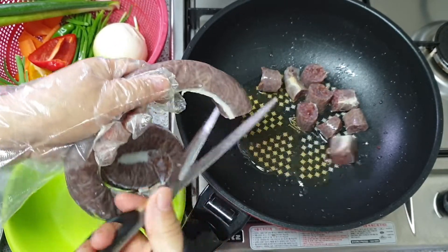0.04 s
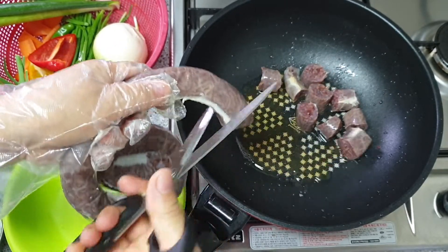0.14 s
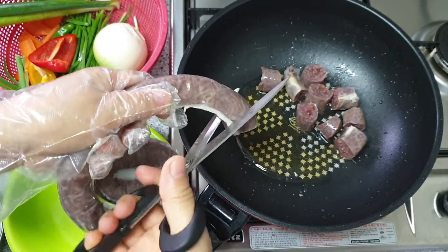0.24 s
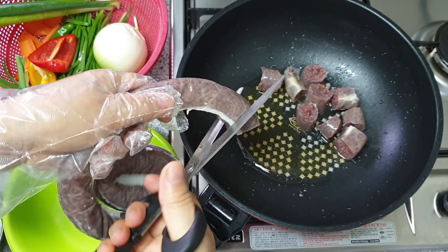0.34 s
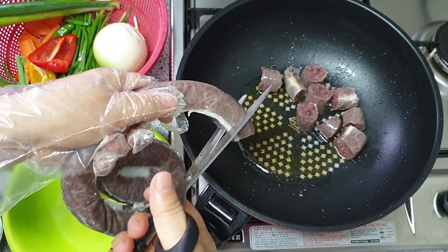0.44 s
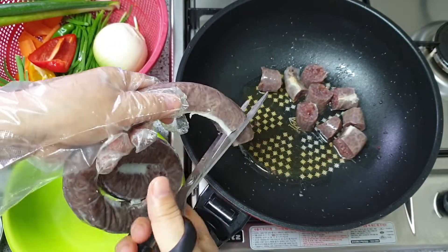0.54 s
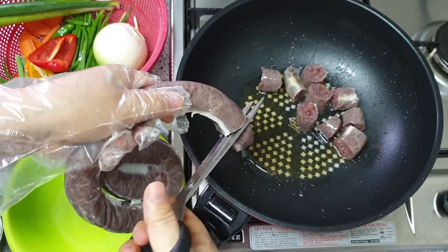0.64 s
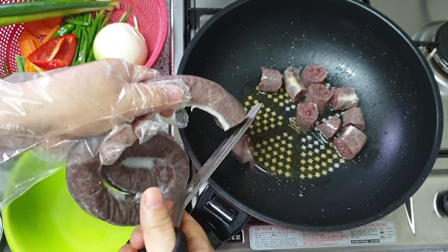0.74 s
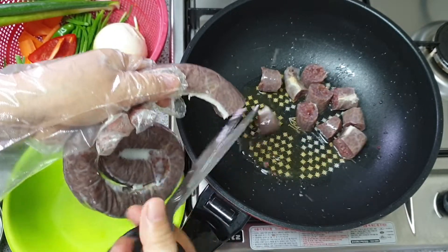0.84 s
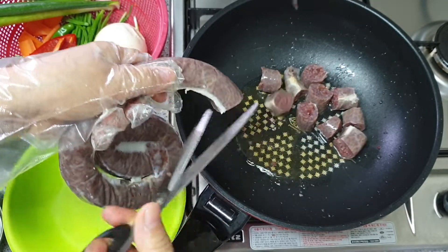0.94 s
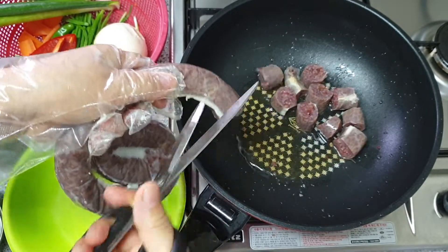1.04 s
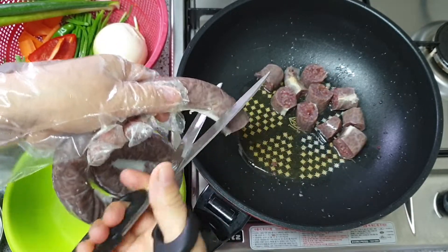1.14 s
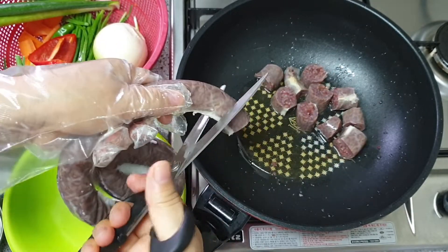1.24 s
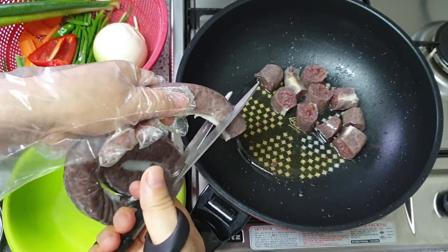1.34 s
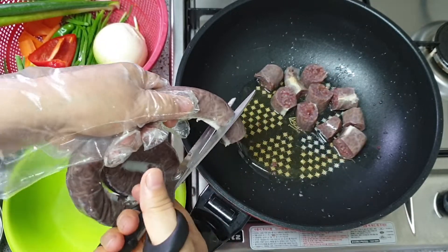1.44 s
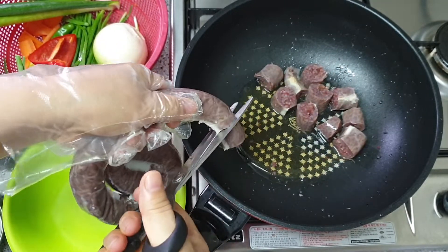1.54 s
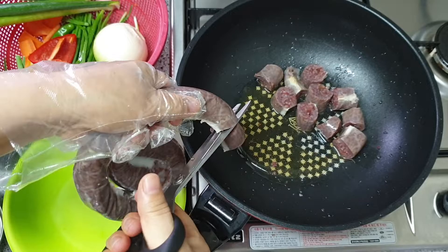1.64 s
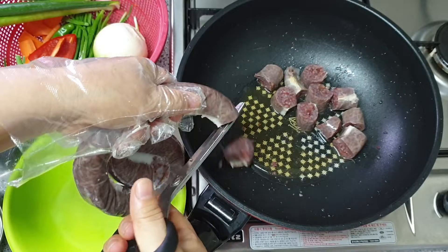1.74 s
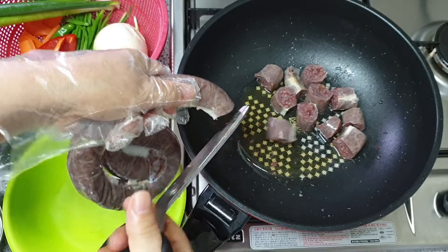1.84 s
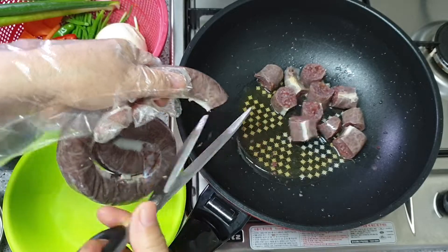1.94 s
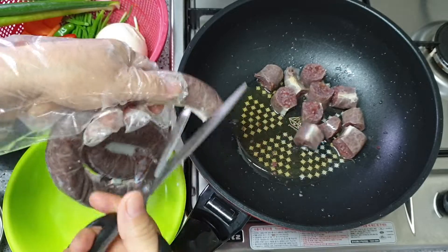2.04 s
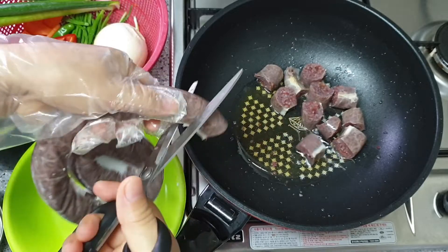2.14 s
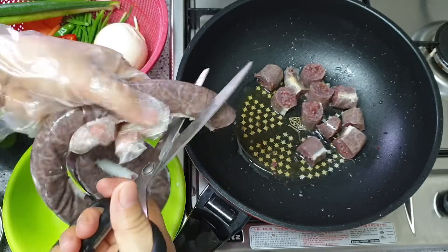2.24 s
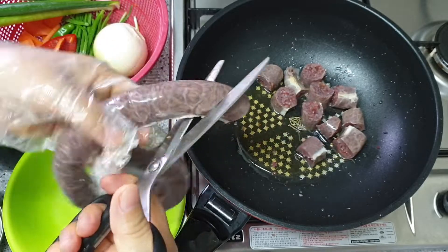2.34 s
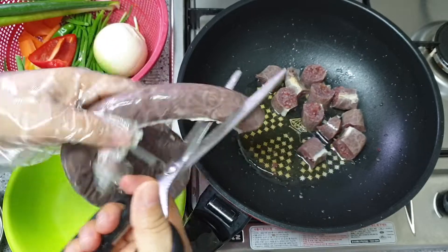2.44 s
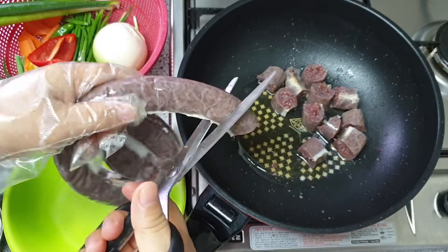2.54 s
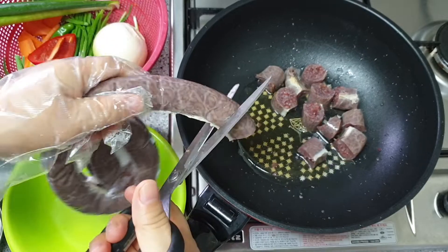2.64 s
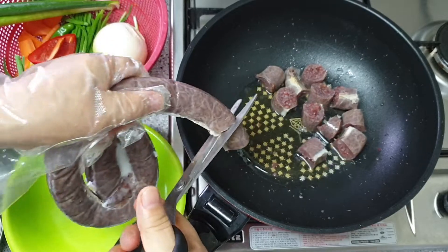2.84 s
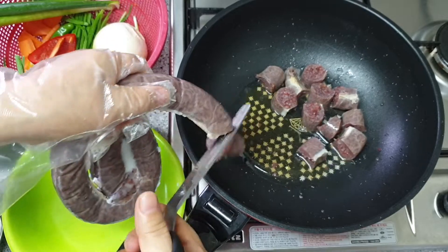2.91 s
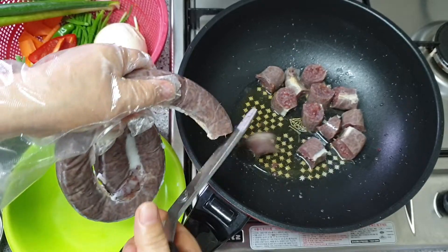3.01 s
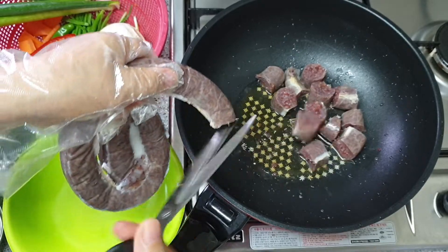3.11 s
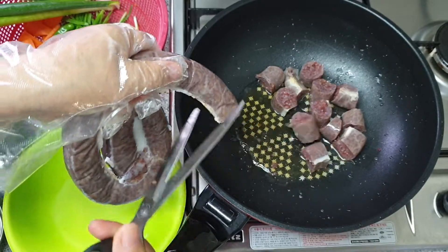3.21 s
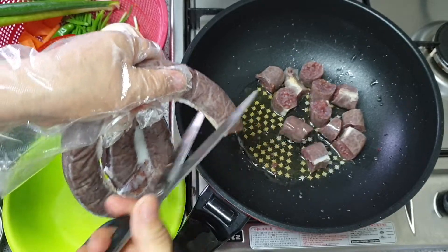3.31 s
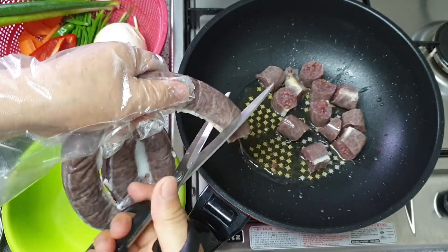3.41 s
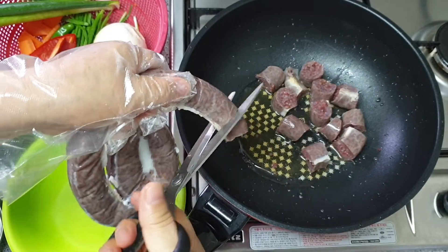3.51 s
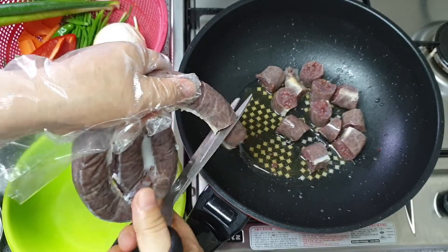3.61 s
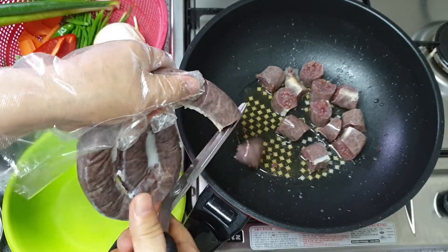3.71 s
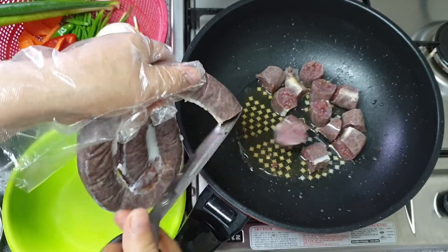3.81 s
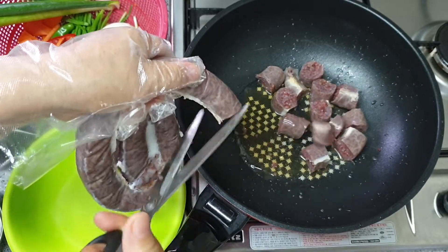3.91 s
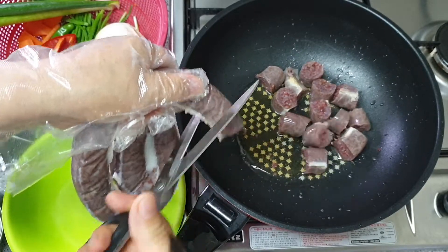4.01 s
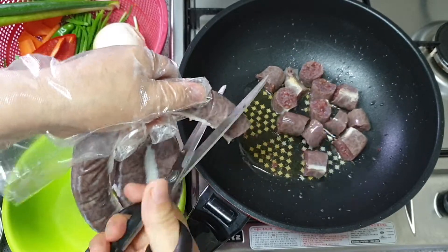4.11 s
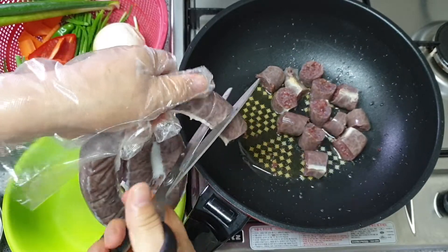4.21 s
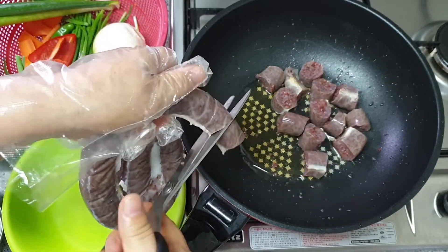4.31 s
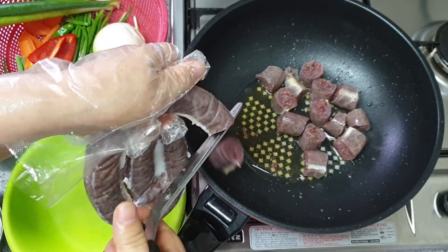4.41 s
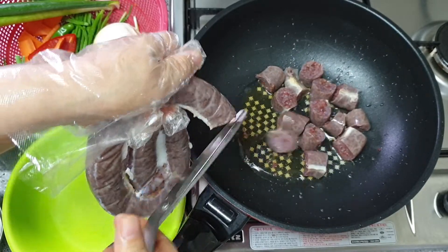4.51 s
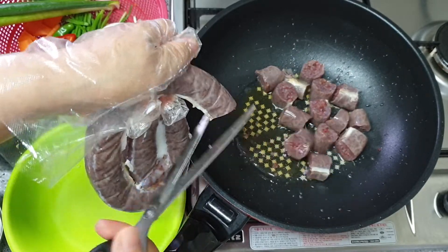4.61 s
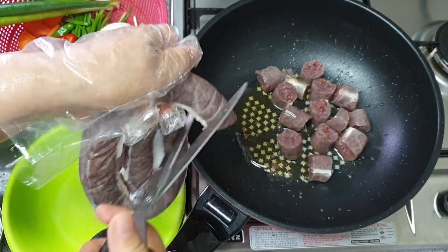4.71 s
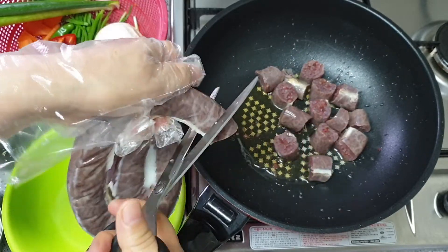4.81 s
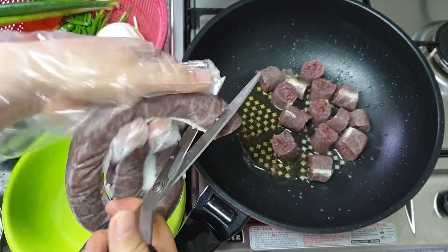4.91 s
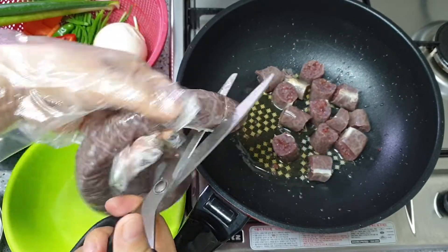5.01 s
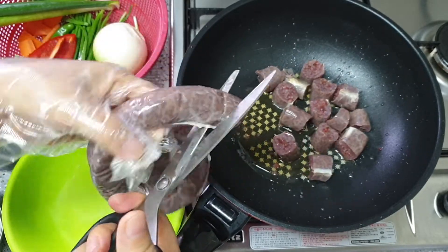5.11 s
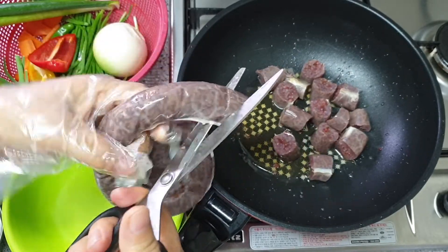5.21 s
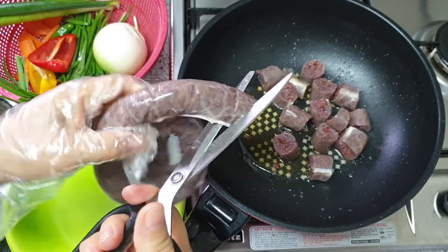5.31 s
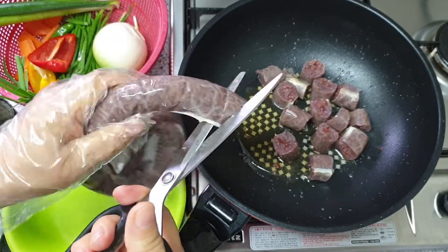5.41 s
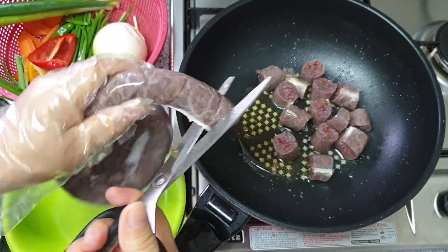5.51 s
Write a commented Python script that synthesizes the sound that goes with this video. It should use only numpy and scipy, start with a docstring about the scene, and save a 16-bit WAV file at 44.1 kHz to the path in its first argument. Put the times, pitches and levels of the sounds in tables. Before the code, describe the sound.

Stereo close microphones in a home kitchen catch six soft pieces of sausage thudding into a pan, tipping and flopping moistly. Scissors press through meat with short, quiet squishes. About halfway the grip shifts, steel blades clack sharply and the pan is bumped several times. Cutting resumes, then the final seconds bring crisp plastic crackling and faint bumps. Soft hiss and a wavering appliance hum continue underneath.

```python
"""A soft sausage is snipped with kitchen scissors, and its pieces thud, slap and roll in a frying pan.
Thuds and slaps excite pan modes; cuts and flops squelch as tiny tears ring a wet pocket of filling.
The thin plastic glove rustles as a spray of ticks with creases snapping; the blades clack with a short ring.
Knocks on the pan come between the drops and after the last one, over the small kitchen's air noise,
hiss and wavering hum."""
import sys
import numpy as np
from scipy import signal
from scipy.fft import rfft, irfft, next_fast_len
from scipy.io import wavfile
from scipy.ndimage import uniform_filter1d

SR = 44100
rng = np.random.default_rng(int(sys.argv[2]) if len(sys.argv) > 2 else 0)


def waveform_to_disk(signal):
    """Save audio, clipped to [-1, 1], as 16-bit WAV at the path in sys.argv[1]."""
    frames = np.transpose(np.atleast_2d(signal))
    scaled = np.clip(frames, -1, 1) * 32767
    samples = np.round(scaled).astype(np.int16)
    wavfile.write(sys.argv[1], SR, samples)


N = 244755
T = np.arange(N) / SR
RING = T[:SR]  # one second, the longest single sound
CLICK = signal.unit_impulse(SR) * np.ones((2, 1))


def amp(db):
    """Decibels to gain."""
    return 10 ** (np.asarray(db) / 20)


def evened(x):
    """Scales to an rms of one."""
    return x / np.sqrt(np.mean(x ** 2) + 1e-20)


def unit(x):
    """Scales to a mean energy of one per channel."""
    return evened(x) / np.sqrt(x.shape[-1])


def read(points, hz):
    """Reads a table on a log-frequency axis."""
    f, value = np.transpose(points)
    return np.interp(np.log(hz + 1), np.log(f + 1), value)


def add(mix, s, sound):
    """Mixes a sound in at time s."""
    part = mix[:, max(round(s * SR), 0):][:, :sound.shape[-1]]
    part += sound[..., :part.shape[1]]


def panned(db):
    """Gains of the two channels for a left-right difference."""
    return amp(np.array([[db], [-db]]) / 2)


def colour(x, db_at, size=4096):
    """Causal minimum-phase filter whose gain in dB is a function of frequency."""
    hz = abs(np.fft.fftfreq(size, 1 / SR))
    log_gain = np.log(amp(db_at(hz)) + 1e-5)
    response = np.exp(np.conj(signal.hilbert(log_gain)))
    taps = np.fft.ifft(response).real[:size // 2]
    return signal.fftconvolve(x, taps[None], axes=1)[:, :x.shape[1]]


def bump(f, hz, width):
    """Gain of one resonance in dB."""
    return -10 * np.log10(1 + ((f ** 2 - hz ** 2) / (width * f + 1)) ** 2)


# How alike the two channels of diffuse sound are. Each row: frequency in Hz, likeness from 0 to 1.
STEREO_LIKENESS = [(50, 0.93), (200, 0.84), (500, 0.75), (1000, 0.12), (2000, 0), (4000, 0.044), (16000, 0)]


def diffuse(count, db_at=np.zeros_like):
    """Noise from all sides: alike at both microphones in the bass, unrelated in most of the treble."""
    size = next_fast_len(count)
    hz = np.fft.rfftfreq(size, 1 / SR)
    a, b = rfft(rng.standard_normal((2, size)))
    same = np.clip(read(STEREO_LIKENESS, hz), -1, 1)
    mid = a * np.sqrt(1 + same)
    side = b * np.sqrt(1 - same)
    spectrum = np.array([mid + side, mid - side]) * amp(db_at(hz))
    return evened(irfft(spectrum, size)[:, :count])


def burst(t60, room_db, room_t60):
    """A quick scatter off nearby things, followed by the kitchen's tail."""
    scatter = unit(amp(-60 * RING / t60))
    tail = amp(room_db) * unit(amp(-60 * RING / room_t60))
    return diffuse(SR) * np.hypot(scatter, tail)


def modes(table, spread):
    """Dying sines; random time offsets (spread in seconds) put the high ones out of step in stereo."""
    out = np.zeros((2, SR))
    for k, (hz, db, t60) in enumerate(table):
        time = RING + spread * rng.standard_normal((2, 1))
        out += (-1) ** k * amp(db - 60 * RING / t60) * np.sin(2 * np.pi * hz * time)
    return out


# Tone of the kitchen air. Each row: frequency in Hz, relative level in dB.
AIR_COLOUR = [(20, -31), (40, 0.5), (65, 0.5), (130, -9), (185, -10.5), (260, -10.5), (420, -11.5),
              (520, -16), (780, -16), (950, -25.5), (1200, -32.5), (1600, -23), (2000, -44), (3500, -60),
              (9000, -30.5), (11000, -22), (16000, -25)]
# Hissy bands in the air. Each row: centre in Hz, width in Hz, level in dB before panning.
HISS_BANDS = [(2265, 57, -78), (2930, 310, -74.5), (4880, 750, -66.5), (7130, 1900, -66),
              (10200, 1200, -74.5), (13700, 1900, -64)]
# Partials of the appliance hum. Each row: frequency in Hz, rms level in dB.
HUM_PARTIALS = [(70, -59), (135, -66.5), (271, -73), (370, -70), (426, -77.5), (749, -84)]


def kitchen():
    """Steady air noise with a few hissy bands, and an appliance hum whose phase wanders."""
    air = amp(-52) * diffuse(N, lambda f: read(AIR_COLOUR, f))
    hiss = np.zeros((2, N))
    for hz, width, db in HISS_BANDS:
        hiss += amp(db) * diffuse(N, lambda f: 2 * bump(f, hz, width))
    hum = np.zeros(N)
    for hz, db in HUM_PARTIALS:
        wander = 0.013 * np.cumsum(rng.standard_normal(N))  # radians
        hum += amp(db) * np.sqrt(2) * np.sin(2 * np.pi * hz * T + wander)
    return air + hiss * panned(db=-9) + hum


def swell(s, width):
    """A smooth bell-shaped rise and fall around time s."""
    return np.exp(-.5 * ((T - s) / width) ** 2)


# The grip shifts in the glove. Each row: at full strength from in seconds, held in seconds, level in dB,
# rise in dB per second, fall in dB per second, brightness in dB per octave.
GRIP_SHIFTS = [(2.21, 0.04, -51, 121, 78, 2.3), (2.43, 0.018, -33, 69, 75, -1.15),
               (4.21, 0.17, -50, 150, 20, 1), (4.945, 0.2, -40, 93, 53, -0.1),
               (5.25, 0.35, -45.5, 105, 60, -0.1)]
HOLD_DB = -61.5  # the film is never quite still
SQUEEZE_DB, SQUEEZE_S = -56, 0.064  # the hand tightens for each cut
FEED_DB, FEED_AFTER_S, FEED_S = -51.5, 0.11, 0.064  # it pushes the sausage on after each drop but the first


def rubbing():
    """How hard the film is rubbed, and how bright: holding, squeezing, feeding and shifts of the grip."""
    power = np.full(N, amp(HOLD_DB) ** 2)
    for s, *_ in CUTS:
        power += (amp(SQUEEZE_DB) * swell(s, SQUEEZE_S)) ** 2
    for s, *_ in DROPS[1:]:
        power += (amp(FEED_DB) * swell(s + FEED_AFTER_S, FEED_S)) ** 2
    bright = np.zeros(N)
    for s, held, db, rise, fall, tilt in GRIP_SHIFTS:
        before, after = np.maximum(s - T, 0), np.maximum(T - s - held, 0)
        grip = amp(db - rise * before - fall * after)
        power += grip ** 2
        bright += tilt * grip ** 2
    return np.sqrt(power), bright / power


def patchy(x, patchy_db, size=256):
    """Single folds crinkle in turn, each for a few milliseconds in its own band."""
    z = signal.stft(x, nperseg=size)[2]
    folds = rng.standard_normal(z.shape[1:])
    folds = uniform_filter1d(folds, size=20, axis=0)  # across frequency
    folds = evened(uniform_filter1d(folds, size=3, axis=1))  # across time
    return signal.istft(z * amp(patchy_db * folds), nperseg=size)[1][:, :N]


CREASES_PER_S = 18
CREASE_OVER_RUB_DB, CREASE_SPREAD_DB = 15.5, 6
CREASE_HZ = (4970, 12600)  # lowest and highest centre


def creases(level):
    """Chance snaps, as (s, dB, Hz), that follow the strength of the rubbing at that moment."""
    for when, size, pitch in rng.random((round(CREASES_PER_S * N / SR), 3)):
        rub_db = 20 * np.log10(level[int(when * N)])
        db = rub_db + CREASE_OVER_RUB_DB + CREASE_SPREAD_DB * (2 * size - 1)
        yield when * N / SR, db, np.interp(pitch, [0, 1], CREASE_HZ)


# Distinct creases snap. Each row: start in seconds, energy in dB, centre in Hz.
CREASE_SNAPS = [(3.6642, -18, 6000), (4.159, -24.5, 5600), (4.3302, -18.5, 10500), (4.7467, -26, 6900),
                (5.2454, -9, 5900), (5.276, -19, 6370), (5.3134, -13, 6500), (5.3474, -14, 9500),
                (5.4413, -13, 11500)]
# Tone of the plastic film. Each row: frequency in Hz, relative level in dB.
FILM_COLOUR = [(200, -11), (500, 0.5), (1000, 2), (1700, 3), (3000, 3), (5000, 7), (7400, 5), (8800, -2),
               (11000, 7), (13500, 1.5), (16000, 2)]


def glove():
    """Thin film crackles in a dense spray of tiny ticks; a few creases snap on their own."""
    level, bright = rubbing()
    sizes = amp(3.2 * np.minimum(rng.exponential(1, N), 3.8))
    ticks = sizes * (rng.random(N) < 900 / SR) * rng.choice([-1, 1], N)  # about 900 per second
    scatter = burst(t60=0.0029, room_db=2.5, room_t60=0.071)
    spray = evened(signal.fftconvolve(ticks[None], scatter, axes=1)[:, :N])
    crinkle = patchy(spray + .55 * diffuse(N), patchy_db=2.4)
    film = evened(colour(crinkle, lambda f: read(FILM_COLOUR, f)))
    # the brightness moves with the grip, pivoting at 6 kHz
    hz, t, z = signal.stft(film, SR, nperseg=256)
    tilt_db = np.interp(t, T, bright) * np.log2(np.maximum(hz, 1000) / 6000)[:, None]
    out = level * signal.istft(z * amp(tilt_db), nperseg=256)[1][:, :N]
    for s, db, centre in CREASE_SNAPS + list(creases(level)):
        snap = .6 * CLICK + burst(t60=.003, room_db=-3, room_t60=.13)
        add(out, s, amp(db) * unit(colour(snap, lambda f: 2 * bump(f, centre, 0.79 * centre))))
    return out


# A piece drops into the pan. Each row: start in seconds, then relative levels in dB of force, rebound,
# deep rocking of the stove, roll and slap, slap brightness in dB per octave, and relative levels in dB
# of wet squish and last tap.
DROPS = [(0.001, -40.5, -38, 5.5, -51, -13.5, 1.5, -41.5, -46),
         (0.790, -30, -50, -2.5, -48, -7, 3, -47, -27),
         (1.798, -29.5, -45.5, -0.5, -33.5, -9.5, -3.5, -44.5, -44),
         (2.9968, -32.5, -37.5, 4, -36.5, -8, -4.5, -43.5, -25.5),
         (3.771, -33, -33.5, -5, -52, -8, 2, -58, -40),
         (4.473, -30, -28.5, 0, -39.5, -10.5, -3.5, -47, -25)]
# How each piece tumbles. Each row, in seconds from its landing: tips over, rebounds, flops, comes to rest.
TUMBLES = [(.048, .046, .032, .14), (.014, .035, .055, .175), (.018, .043, .036, .29),
           (.022, .036, .062, .354), (.016, .026, .045, .29), (.021, .033, .048, .274)]
# The pan is knocked while the sausage is handled. Each row: start in seconds, relative force in dB, contact
# time in seconds, deep rocking in dB, relative level of the sharp slap in dB, brightness in dB per octave.
KNOCKS = [(2.415, -39.5, 0.00058, 9, -29, 0), (2.458, -35, 0.0014, -3.5, 0.5, -7.5),
          (2.523, -26.5, 0.0095, 1, -13.5, 9.5), (2.5679, -28.5, 0.0018, -6.5, -1.5, 1),
          (2.633, -49, 0.0033, -2, -16, 3.5), (2.6654, -34.5, 0.0018, 0, -2, 1),
          (3.984, -33, 0.016, 4.5, -40, -2), (5.12, -44, 0.0013, 7.5, -27, -2),
          (5.152, -46, 0.0029, 0, -35, 2)]
FIRST_CONTACT_S, SOFT_CONTACT_S = 0.0022, 0.0038  # the first blow is harder than the rebound and the roll
REBOUND_ROCK_DB, ROLL_ROCK_DB = 2.5, 6  # the first adds to the landing's rocking
ROLL_STEP_S, ROLL_FADE_DB_PER_S = 0.122, 28  # one bump for each face that rolls by


def pan_thuds():
    """Every dull blow, as (s, dB, contact s, rocking dB): landing, rebound and fading roll; and the knocks."""
    for (s, db, rebound_db, rock_db, roll_db, *_), (_, rebound, _, rest) in zip(DROPS, TUMBLES):
        yield s, db, FIRST_CONTACT_S, rock_db
        yield s + rebound, rebound_db, SOFT_CONTACT_S, rock_db + REBOUND_ROCK_DB
        for age in np.arange(ROLL_STEP_S, rest, ROLL_STEP_S):
            fade_db = ROLL_FADE_DB_PER_S * (age - ROLL_STEP_S)
            yield s + age, roll_db - fade_db, SOFT_CONTACT_S, ROLL_ROCK_DB
    for s, db, contact, rock_db, *_ in KNOCKS:
        yield s, db, contact, rock_db


# Modes of the pan on its stove. Each row: frequency in Hz, relative level in dB, 60 dB decay in seconds.
PAN_MODES = [(46.2, -12.5, 0.39), (69.46, -3.5, 1), (87.4, -0.5, 0.22), (134.7, -1, 0.5), (177, -10, 1),
             (195, -22, 0.99), (226, -5, 0.47), (242.7, -2.5, 0.28), (280, -23, 0.42), (314, -16, 0.27),
             (367, -17, 0.72), (430.7, -8, 0.4), (459.4, -9.5, 0.37), (678, -14, 0.24), (752, -4, 0.15),
             (786, -23, 0.067), (799, -3, 0.089), (913, -13, 0.14), (981, -11, 0.085), (1164, -6, 0.15),
             (1175, -21, 0.047), (1248, -2, 0.069), (1292, -19.5, 0.25), (1570, -19.5, 0.67),
             (2330, -22.5, 0.41)]


def thuds():
    """Soft meat pushes the pan floor: the longer the contact, the duller the boom."""
    out = np.zeros((2, N))
    floor = 3 * amp(-60 * RING / .045) * np.sin(2 * np.pi * 215 * RING) * (1 - np.exp(-RING / .002))
    # the rest of the pan and the stove follow more slowly
    ring = modes(PAN_MODES, spread=.0001) * (1 - np.exp(-RING / 0.014))
    room_colour = [(24, -19), (45, 1.5), (140, -2.5), (250, -0.5), (450, -7), (800, -4), (2000, -50)]
    for s, db, contact, rock_db in pan_thuds():
        scatter = burst(t60=0.086, room_db=18, room_t60=0.82)
        room = unit(colour(scatter, lambda f: read(room_colour, f)))
        boom = floor + amp(-2) * ring + amp(28) * room
        softness = lambda f: -10 * np.log10(1 + (f * contact) ** 4)
        rocking = lambda f: read([(80, rock_db), (125, 0)], f)
        add(out, s, amp(db) * colour(boom, lambda f: softness(f) + rocking(f)))
    return out * panned(db=1.35)


# The wet face skids in small fading taps after tipping over: delays in seconds.
SKID_STEPS_S = (0.007, 0.016, 0.029, 0.052, 0.077)
SKID_DB, SKID_FADE_DB_PER_S, SKID_TILT = -11, 98, 3.1  # level re the slap; tilt in dB per octave
FLOP_SLAP_DB, FLOP_TILT = -11, 1.7  # re the tipping slap; dB per octave
SETTLE_TILT = 7.6  # dB per octave


def pan_slaps():
    """Every sharp contact, as (s, dB, brightness): a piece tips, skids, flops and settles; and the knocks."""
    for (s, *_, db, tilt, _, rest_db), (tip, _, flop, rest) in zip(DROPS, TUMBLES):
        yield s + tip, db, tilt
        for age in SKID_STEPS_S:
            yield s + tip + age, db + SKID_DB - SKID_FADE_DB_PER_S * age, SKID_TILT
        yield s + flop, db + FLOP_SLAP_DB, FLOP_TILT
        yield s + rest, rest_db, SETTLE_TILT
    for s, *_, db, tilt in KNOCKS:
        yield s, db, tilt


# Tone of wet meat on metal. Each row: frequency in Hz, relative level in dB.
SLAP_COLOUR = [(150, 10), (400, -17), (600, -3.5), (780, 0), (1250, 7), (1450, -4), (2300, -11),
               (4000, -17), (8000, -32), (16000, -35)]


def slaps():
    """The piece tips onto a wet face, which rings the pan's higher modes."""
    out = np.zeros((2, N))
    high_modes = [(200, -60.5), (450, -2), (700, 1)]
    ring = unit(colour(modes(PAN_MODES, spread=.00006), lambda f: read(high_modes, f)))
    for s, db, tilt in pan_slaps():
        contact = .8 * CLICK + burst(t60=.045, room_db=-4.5, room_t60=.33)
        smack = unit(colour(contact, lambda f: read(SLAP_COLOUR, f)))
        brightness = lambda f: tilt * np.log2(np.clip(f, 500, 5000) / 1000)
        add(out, s, amp(db) * unit(colour(smack + amp(-7) * ring, brightness)))
    return amp(2) * out


# The blades squeeze through skin and filling. Each row: start in seconds, relative level in dB,
# pitch of the wet pocket in Hz, edge scrape against it in dB.
CUTS = [(0.691, -44.5, 2660, 0.5), (1.696, -50.5, 2820, 8), (2.917, -45.5, 2650, 0.5),
        (3.66, -49, 2780, 6.5), (4.378, -45, 2660, 2.5)]
CUT_S = 0.025
# the filling gives with a low gulp just before the skin parts
GULP_LEAD_S, GULP_DB, GULP_HZ, GULP_SCRAPE_DB = 0.021, -7.5, 630, 2
# the filling is squashed as the piece flops
SQUISH_S, SQUISH_HZ, SQUISH_SCRAPE_DB = 0.015, 2630, -9.5
# then the wet face peels off the metal
PEEL_AFTER_S, PEEL_DB, PEEL_HZ, PEEL_SCRAPE_DB = 0.024, -11, 4680, -16


def squeezes():
    """Every squeeze, as (s, dB, length s, Hz, scrape dB): gulp and tear per cut, squish and peel per flop."""
    for s, db, hz, scrape_db in CUTS:
        yield s - GULP_LEAD_S, db + GULP_DB, CUT_S, GULP_HZ, GULP_SCRAPE_DB
        yield s, db, CUT_S, hz, scrape_db
    for (s, *_, db, _), (_, _, flop, _) in zip(DROPS, TUMBLES):
        yield s + flop, db, SQUISH_S, SQUISH_HZ, SQUISH_SCRAPE_DB
        yield s + flop + PEEL_AFTER_S, db + PEEL_DB, SQUISH_S, PEEL_HZ, PEEL_SCRAPE_DB


def squelches():
    """Tiny wet tears sound through a pocket in the filling, along with a brighter scrape."""
    out = np.zeros((2, N))
    scrape_colour = [(800, -4.5), (2500, -11), (6000, 1), (9000, -9), (13000, -1.5), (16000, -6)]
    for s, db, length, hz, scrape_db in squeezes():
        age = RING / length
        sizes = amp(2 * np.minimum(rng.exponential(1, SR), 4))
        tears = sizes * (rng.random(SR) < 4000 / SR) * rng.choice([-1, 1], SR)  # about 4000 per second
        tears = tears * (1 - np.exp(-age / 0.039)) * np.exp(-age / .5)
        scatter = burst(t60=0.0023, room_db=-7, room_t60=0.3)
        heard = signal.fftconvolve(tears[None], scatter, axes=1)
        wet = unit(colour(heard, lambda f: 2 * bump(f, hz, 0.24 * hz)))
        scrape = unit(colour(heard, lambda f: read(scrape_colour, f)))
        add(out, s, amp(db) * np.sqrt(length * SR) * (wet + amp(scrape_db) * scrape))
    return amp(-5) * out * panned(db=-2.5)


# Steel meets steel. Each row: start in seconds, level in dB before panning,
# brightness in dB per octave above 6 kHz, left-right difference in dB.
CLACKS = [(0.7874, 0.5, 15, -9.5), (0.7935, -9, 17.5, 17), (2.4177, 4.5, -5, -2), (2.436, 12, -1.5, -3.5)]
# Tone of the blade contact. Each row: frequency in Hz, relative level in dB.
CLACK_COLOUR = [(300, -9), (1700, -19), (2500, -5.5), (3800, -2.5), (5200, 1), (7200, -3.5), (8100, -3.5),
                (8500, -19), (10500, -11), (12500, -13), (15500, -20)]
# Modes of the blades. Each row: frequency in Hz, relative level in dB, 60 dB decay in seconds.
BLADE_MODES = [(3756, -5, .2), (4911, -7, .2), (5076, 0, .27), (5511, -2, .25), (5640, -4, .25),
               (5679, -4, .22), (5950, -6, .18), (6273, -2, .23), (6647, -5, .2), (6929, 0, .22),
               (7110, -1, .2), (7914, -5, .14)]


def clacks():
    """The blades knock together and ring briefly, damped by the hand."""
    out = np.zeros((2, N))
    for s, db, tilt, pan_db in CLACKS:
        strike = .22 * CLICK + .6 * unit(diffuse(SR) * amp(-60 * RING / .009))
        crack = strike + burst(t60=0.043, room_db=-6, room_t60=0.25)
        ring = .36 * unit(modes(BLADE_MODES, spread=.00004))
        steel = unit(colour(crack, lambda f: read(CLACK_COLOUR, f))) + ring
        brightness = lambda f: tilt * np.log2(np.maximum(f / 6000, 1))
        add(out, s, amp(db) * panned(pan_db) * unit(colour(steel, brightness)))
    return out


def scene():
    """Everything heard from above the pan."""
    return kitchen() + glove() + thuds() + slaps() + squelches() + clacks()


def record(dry):
    """A steep linear-phase low-pass limits the band to 15.8 kHz."""
    low_pass = signal.firwin(1023, 15800, window=("kaiser", 9), fs=SR)
    return signal.oaconvolve(dry, low_pass[None], "same")


dry = scene()
out = record(dry)
waveform_to_disk(out)
```